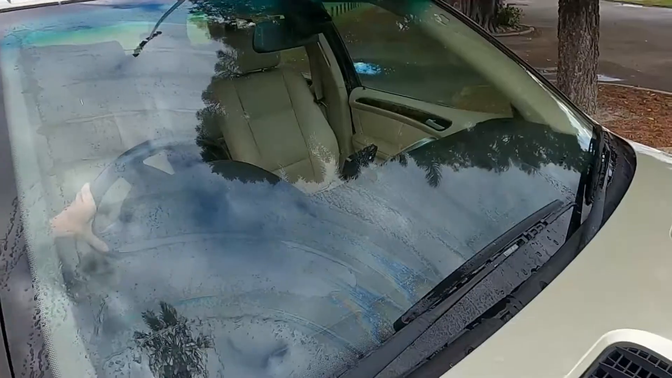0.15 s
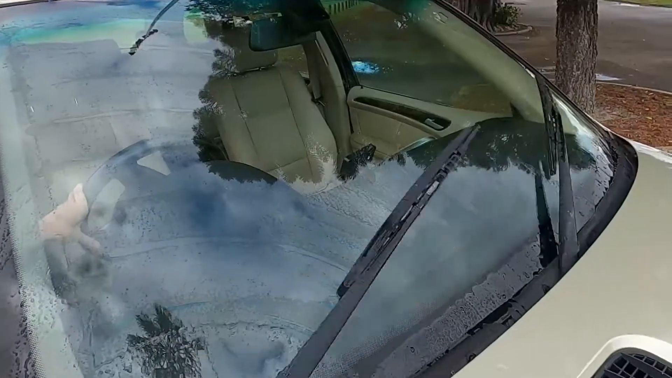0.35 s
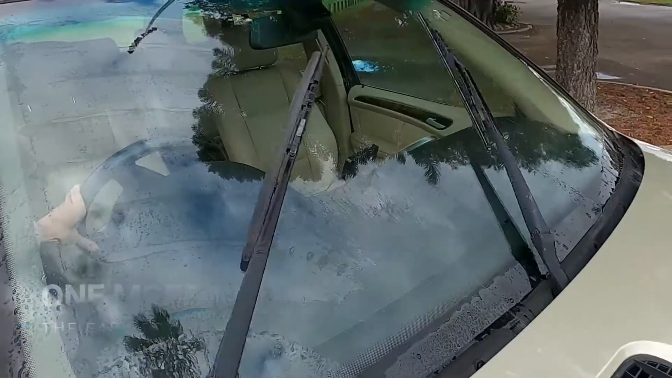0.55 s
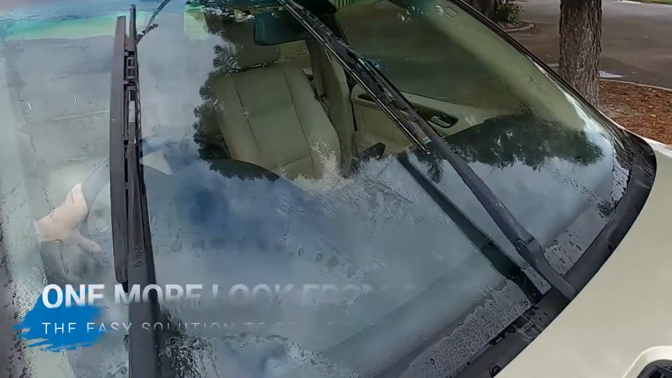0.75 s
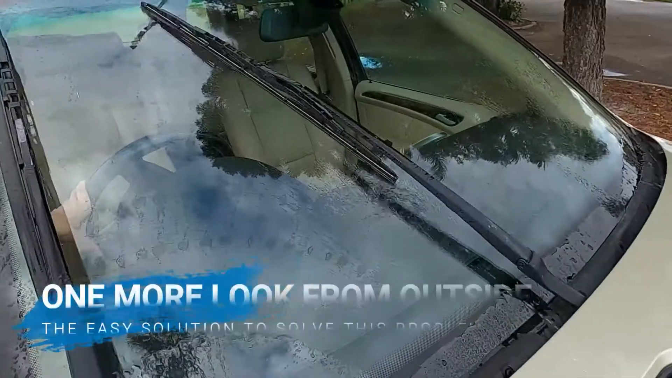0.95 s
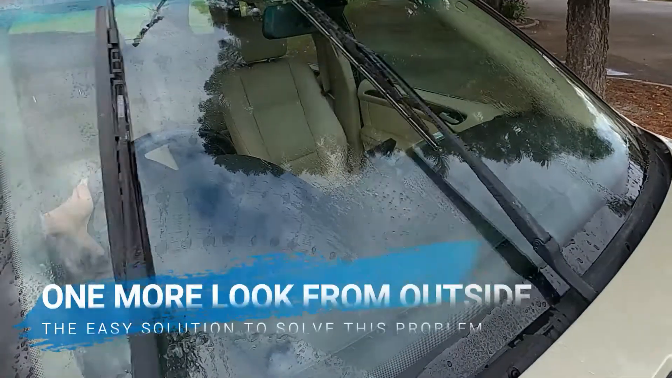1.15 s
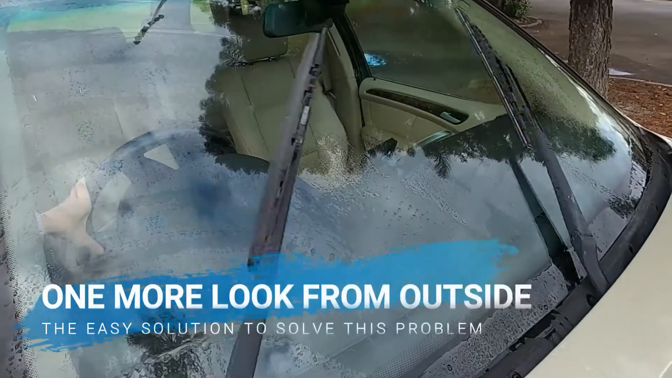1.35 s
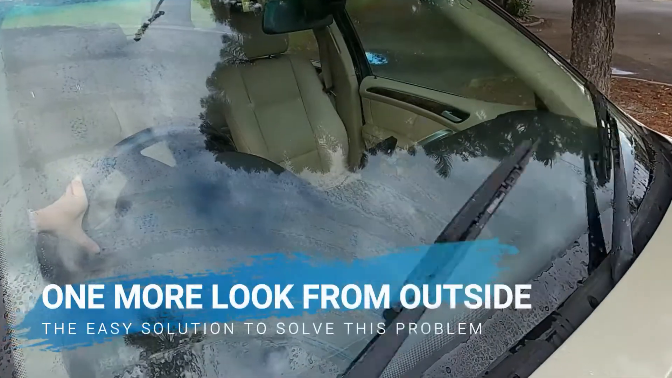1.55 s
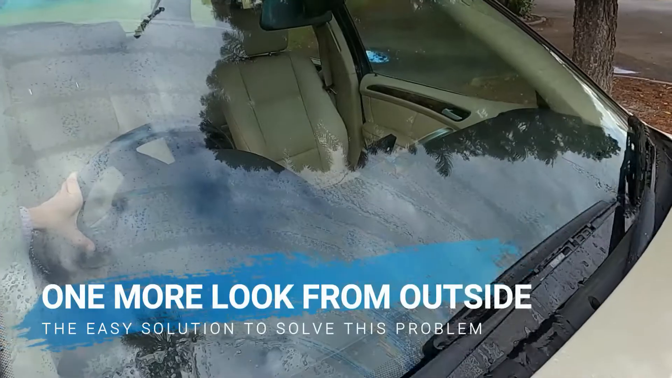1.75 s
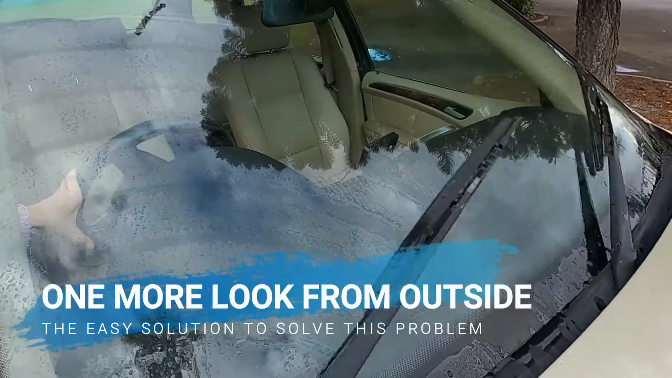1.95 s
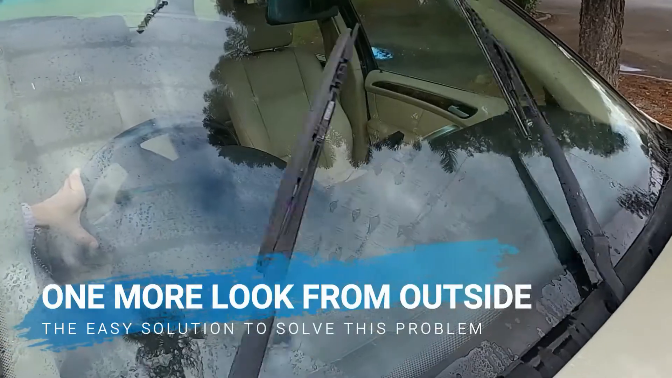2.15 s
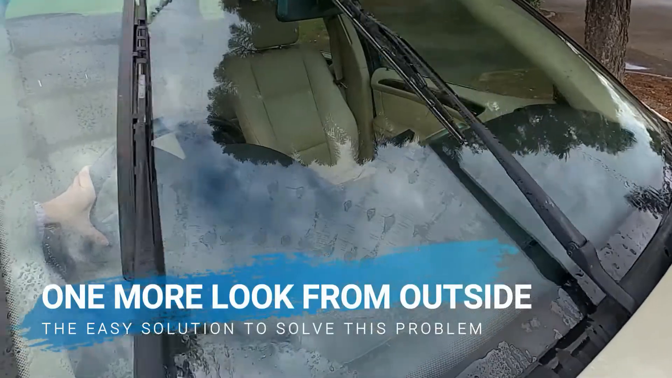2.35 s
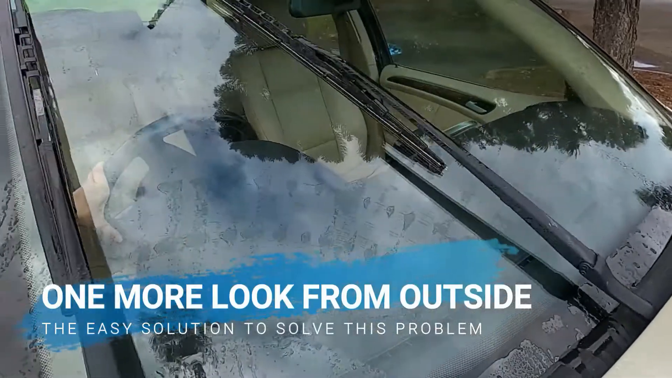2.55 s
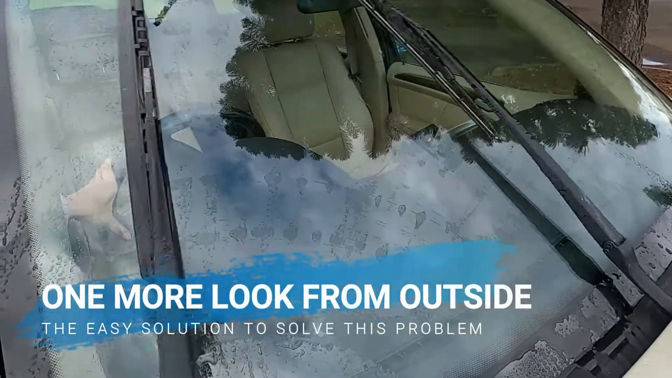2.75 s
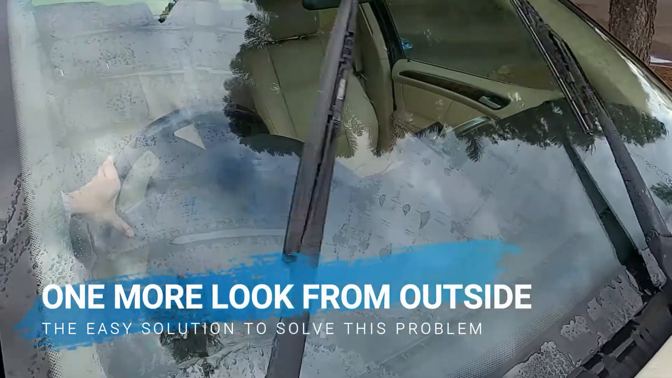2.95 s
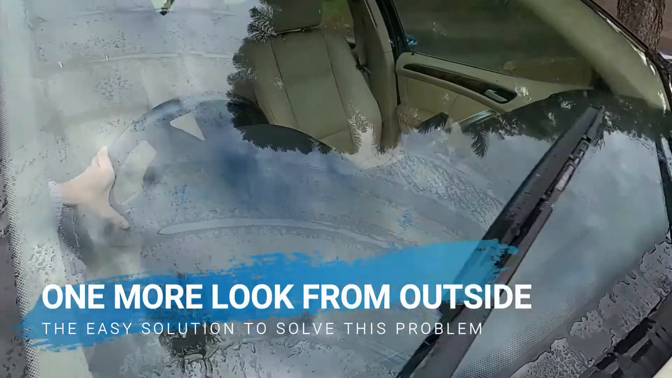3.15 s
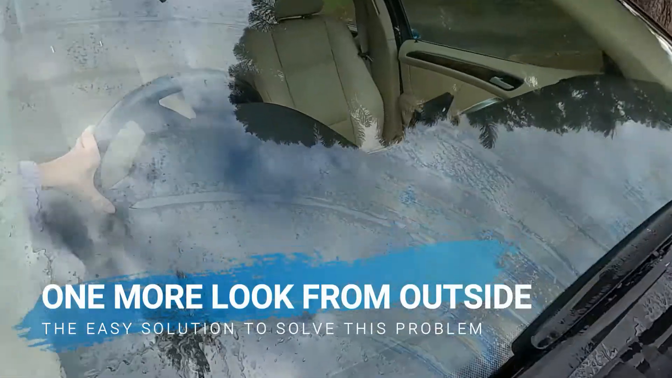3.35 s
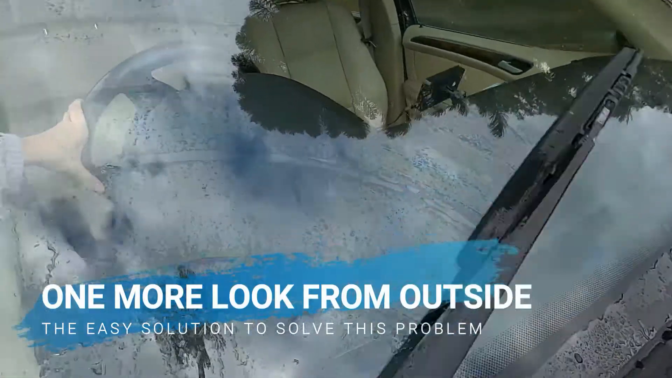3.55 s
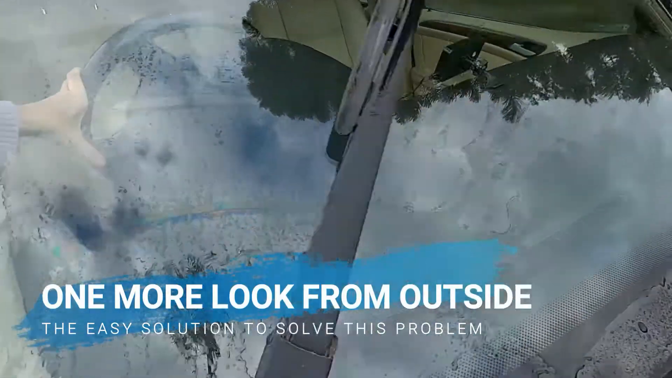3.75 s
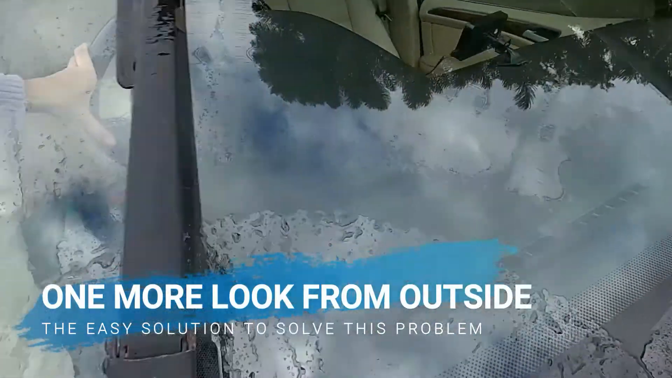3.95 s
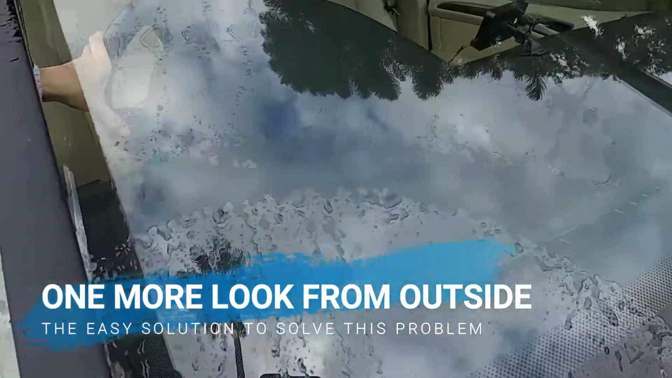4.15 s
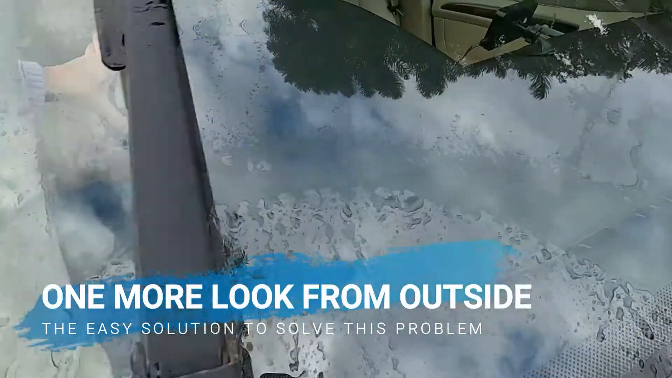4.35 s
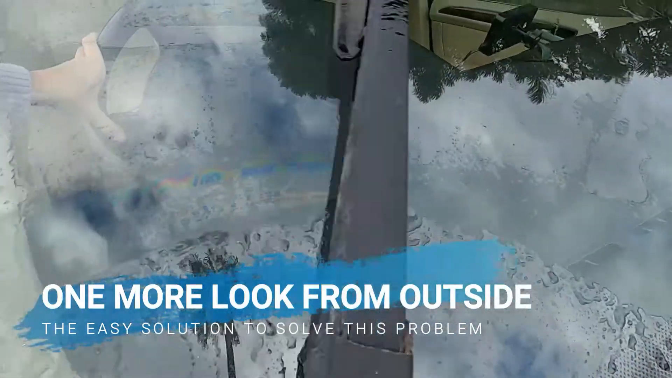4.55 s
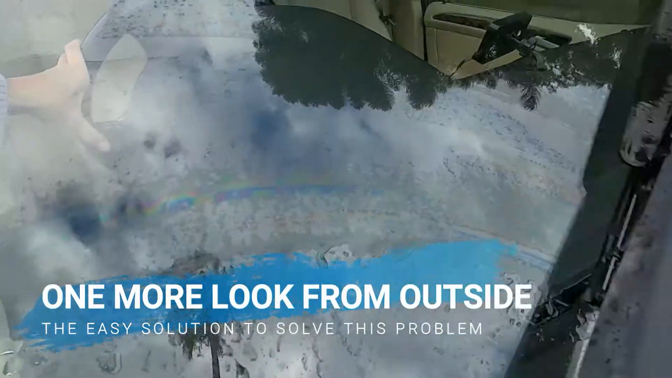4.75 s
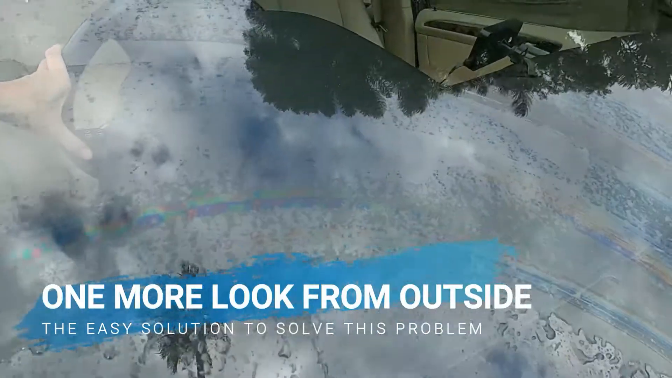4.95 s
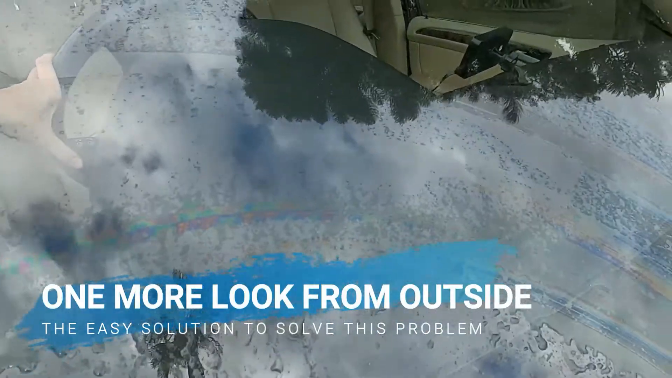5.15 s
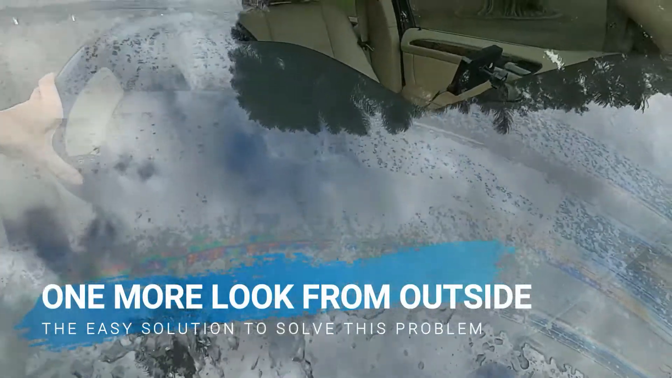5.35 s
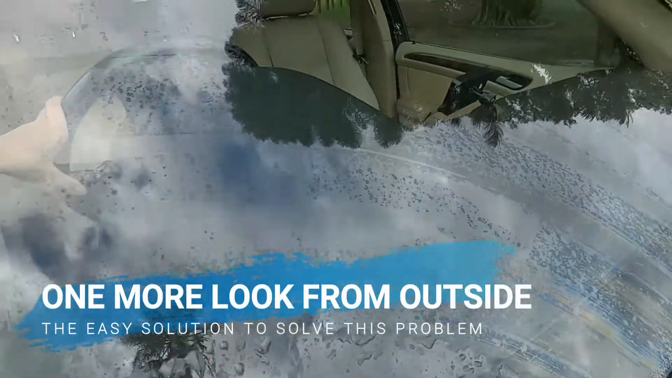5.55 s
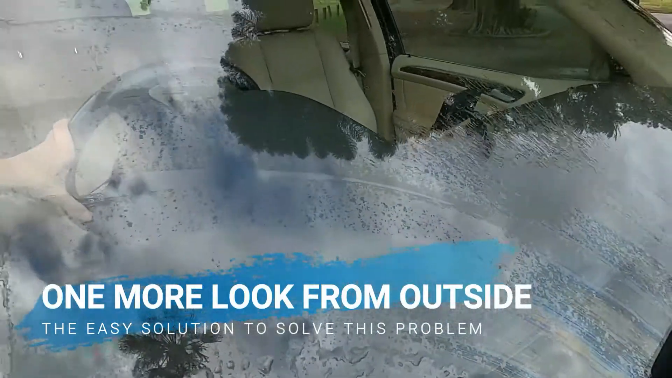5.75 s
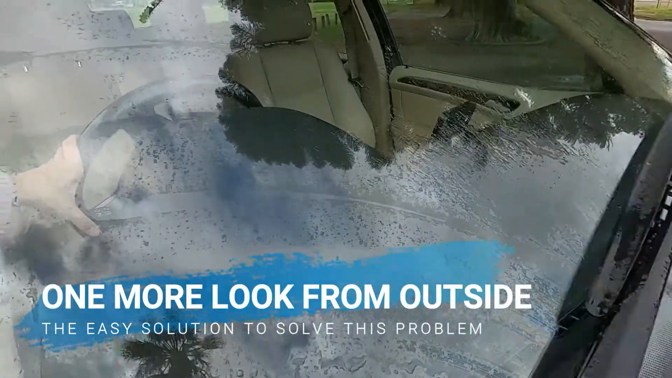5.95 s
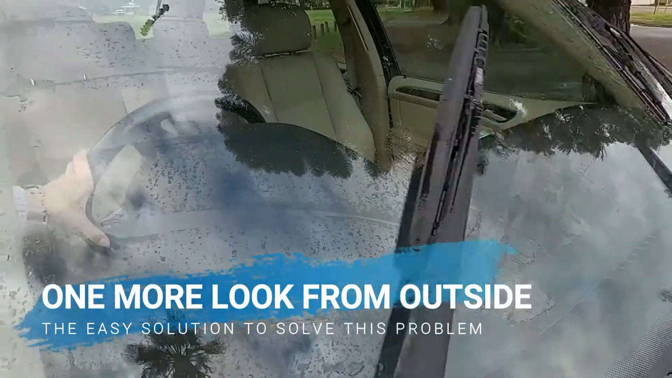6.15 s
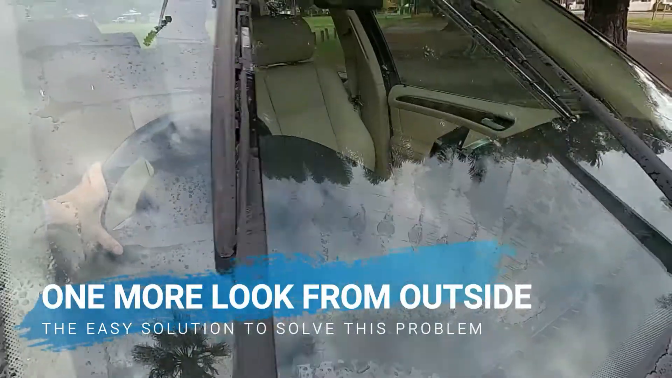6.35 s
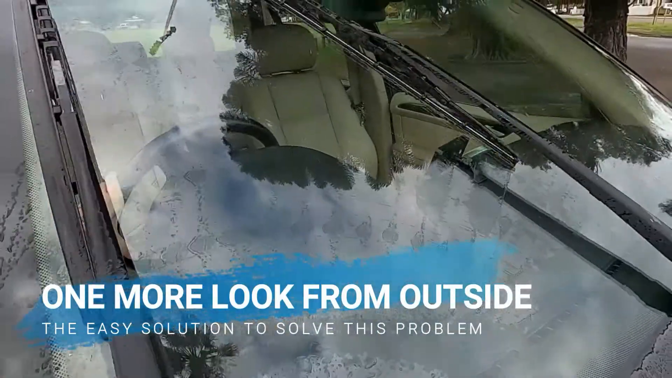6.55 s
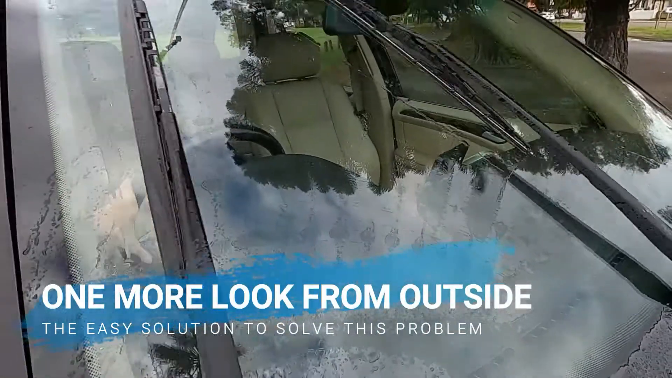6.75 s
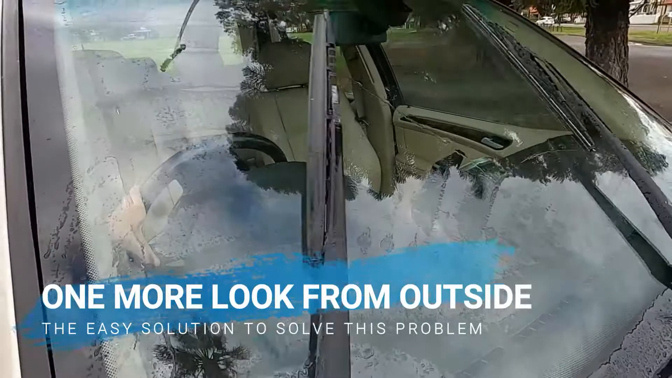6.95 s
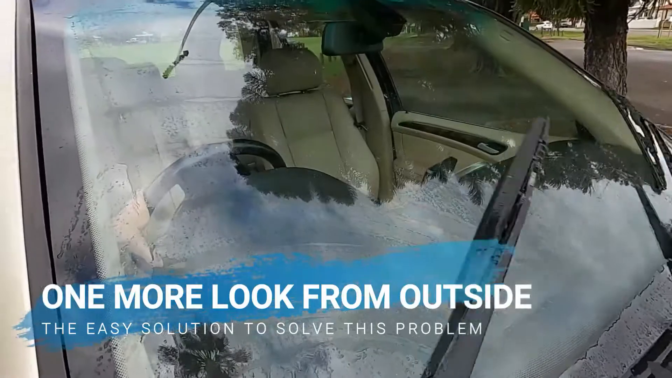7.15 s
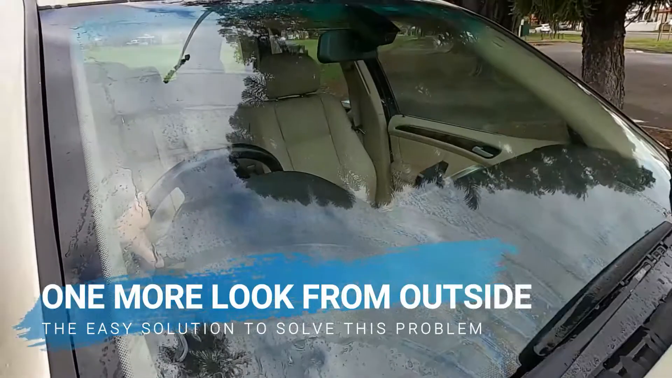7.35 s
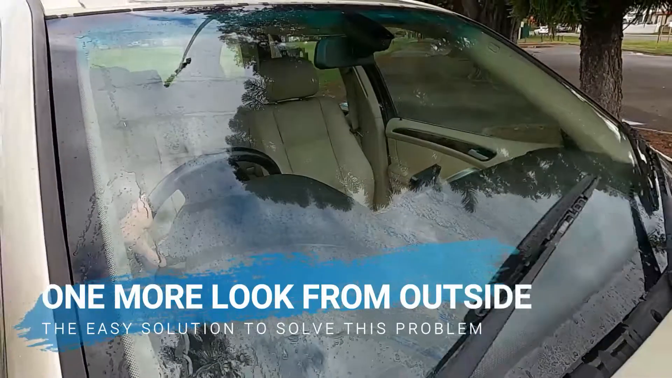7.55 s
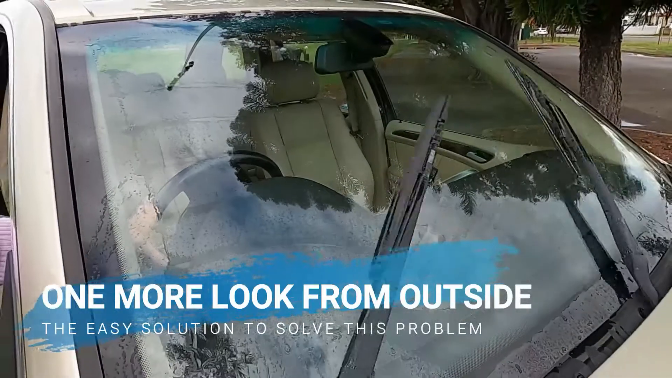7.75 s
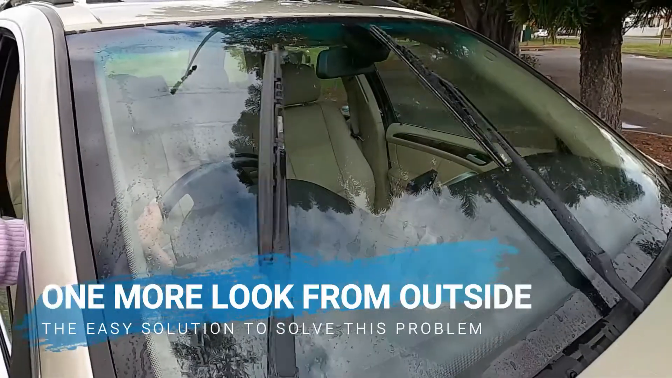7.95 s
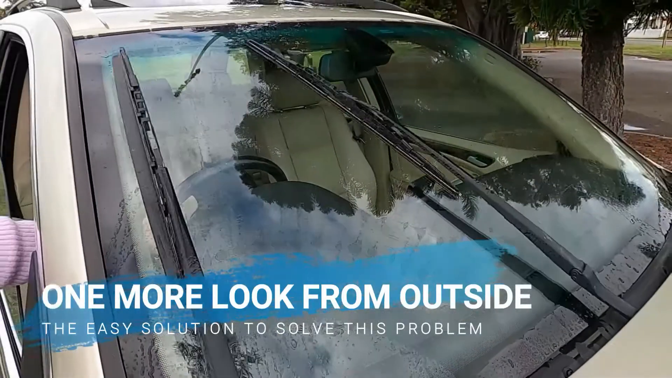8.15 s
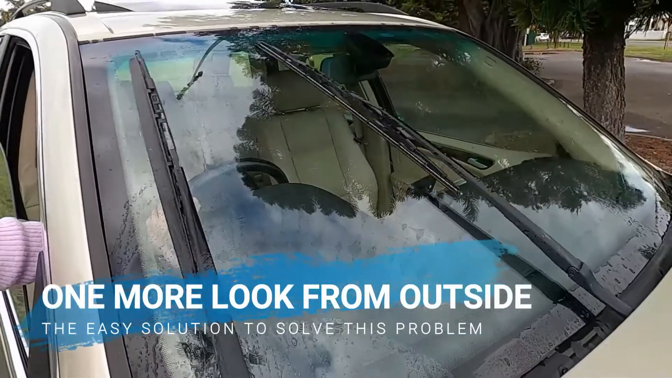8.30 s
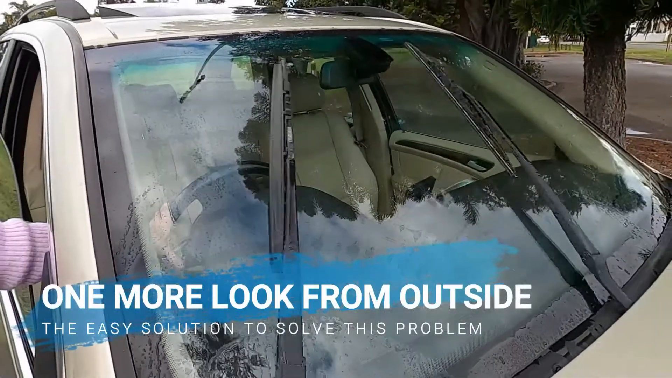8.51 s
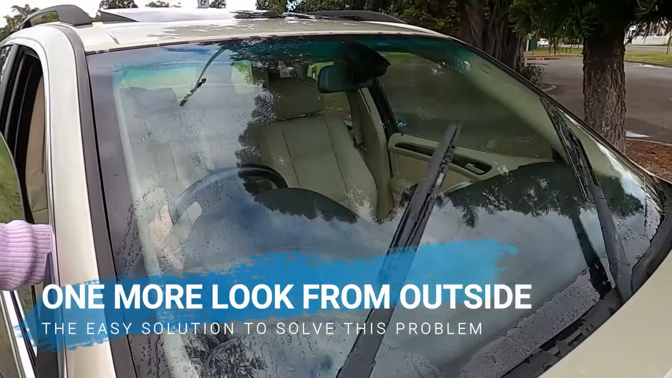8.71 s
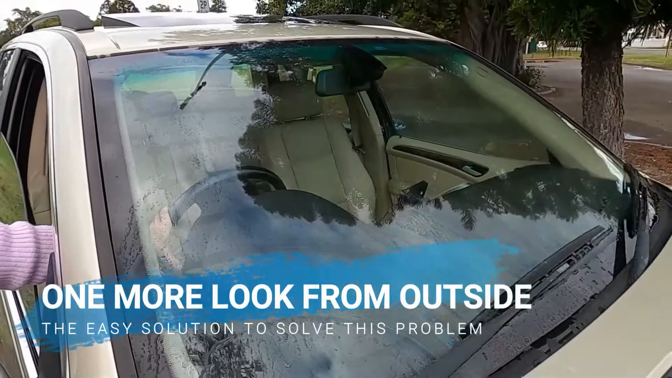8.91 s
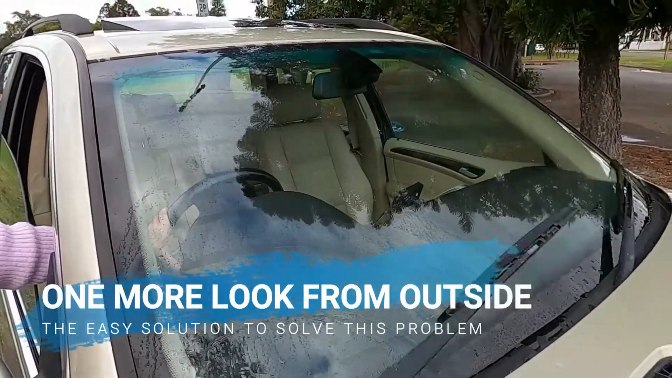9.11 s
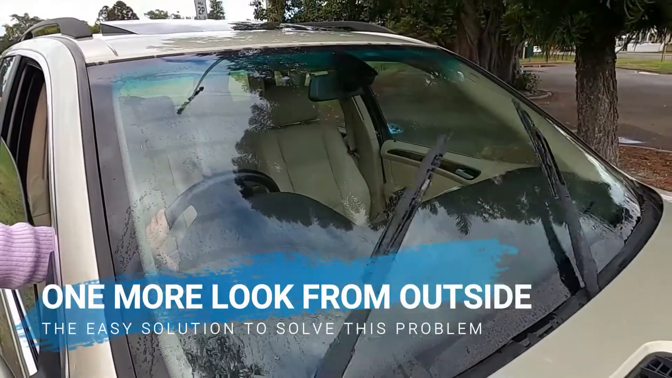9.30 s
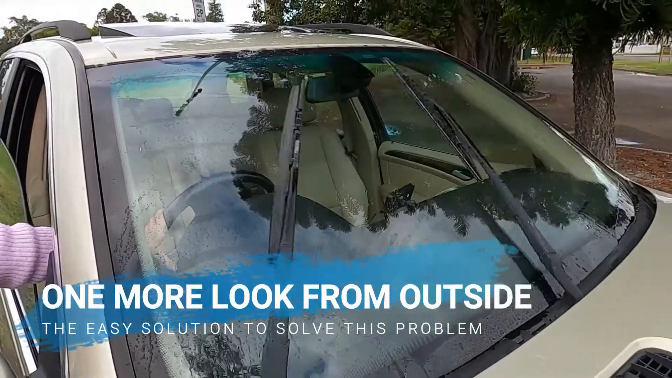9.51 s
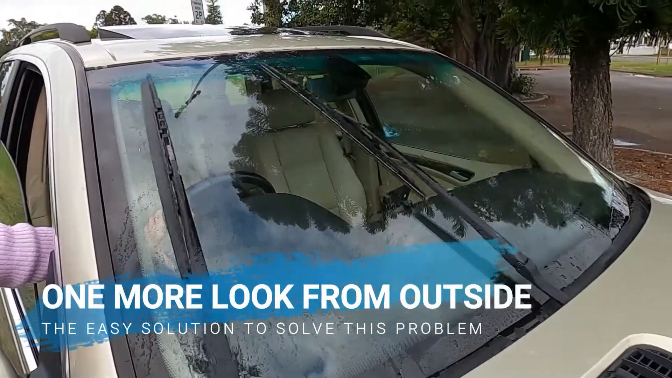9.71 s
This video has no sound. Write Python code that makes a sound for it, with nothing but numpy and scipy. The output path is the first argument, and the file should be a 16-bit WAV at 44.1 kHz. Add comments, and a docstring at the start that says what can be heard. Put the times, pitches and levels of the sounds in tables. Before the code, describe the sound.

A close outdoor microphone hears two wiper blades on a wet windscreen over a low, even rumble. Faint high squeals flicker before 0.4 seconds, when the first wipe grabs: a deep burr of about a hundred uneven slips a second, resonant glass, chattering frames and sharp clacks. Squeaks and arm thumps gather near 1 second, then the return glides quietly with watery swish, ticks and a faint whine. A harder judder with two strong snaps starts at 2.0, with thin squeaks around 2.2 and again near 3.4. The third wipe, from 3.6, is softer at first but ends in busy knocks around 4.2 to 4.6. The blades slide to rest with a wet hiss, quieten near 5, and slide off brightly at 5.8. Strong stuttering wipes follow at 6.05, 7.7 and 9.3, with loud clacks and a thump at 6.1 to 6.2 and quieter wet returns between.

```python
"""Two wiper blades sweep a wet car windscreen, heard close by outdoors over a low rumble of filtered noise.
Thin squeals, gliding sine tones, open the scene and come and go. On each upstroke the rubber sticks and slips:
impulses drum on the resonant glass and arms, and coloured noise bursts make the loose frames chatter and snap.
The arms thump in short pushes; the returns glide on a film of water noise with light ticks and a faint whine.
After three wipes the blades slide to rest with a wet hiss, pause, slide off again and make three more."""
import sys
import numpy as np
from scipy import signal
from scipy.fft import rfft, irfft, next_fast_len
from scipy.io import wavfile
from scipy.ndimage import uniform_filter1d, map_coordinates

SR = 44100
rng = np.random.default_rng(int(sys.argv[2]) if len(sys.argv) > 2 else 0)


def master(y):
    """Save y as 16-bit WAV."""
    cut = np.clip(np.atleast_2d(y).T, -1, 1)
    pcm = np.round(cut * 32767)  # scale
    wavfile.write(sys.argv[1], SR, pcm.astype(np.int16))


N = 430857


def amp(db):
    """Decibels to gain."""
    return 10 ** (np.asarray(db) / 20)


def unit(x):
    """Scale to rms 1."""
    return x / np.sqrt(np.mean(x ** 2) + 1e-20)


def steady(x, size):
    """Even out the running rms to about 1 over about size samples."""
    power = uniform_filter1d(uniform_filter1d(x ** 2, size), size)
    floor = 1e-4 * np.mean(x ** 2)
    return x / np.sqrt(np.abs(power) + floor)


def curves(rows):
    """One value per sample for each column after the time."""
    s, *columns = np.transpose(rows)
    t = np.arange(N) / SR
    return [np.interp(t, s, column) for column in columns]


def wobble(rate):
    """A smooth random curve, rate knots a second."""
    at = np.arange(0, N + 32, 32)
    knots = rng.standard_normal(N // 64)
    values = map_coordinates(knots, [at * rate / SR], mode="wrap")
    return np.interp(np.arange(N), at, values)


def filtered(x, response):
    """Multiply the spectrum of x by a response over frequency."""
    m = next_fast_len(N + SR // 2, True)
    hz = np.fft.rfftfreq(m, 1 / SR)
    return irfft(rfft(x, m) * response(hz), m)[:N]


def coloured(x, points, size=16384):
    """Causal minimum-phase filter through (Hz, dB) points."""
    hz, db = np.transpose(points)
    grid = np.log(np.fft.rfftfreq(size, 1 / SR) + 1)
    cepstrum = irfft(np.log(amp(np.interp(grid, np.log(hz), db))))
    # folding the cepstrum forward in time makes the filter causal
    folded = np.r_[cepstrum[0], 2 * cepstrum[1:size // 2]]
    response = irfft(np.exp(rfft(folded, size)))
    return signal.oaconvolve(x, response[:size // 2])[:N]


def resonate(x, modes):
    """Ring parallel modes of (Hz, width Hz, dB), alternating in sign."""
    out = 0
    for k, (hz, width_hz, db) in enumerate(modes):
        b, a = signal.iirpeak(hz, hz / width_hz, SR)
        out = out + (-1) ** k * amp(db) * signal.lfilter(b, a, x)
    return out


def band(x, low_hz, high_hz):
    """Causal band-pass with 18 dB an octave skirts."""
    return signal.sosfilt(signal.butter(3, [low_hz, high_hz], "band", fs=SR, output="sos"), x)


def slips(rate, scatter_db):
    """One impulse of random size each time the running rate completes a cycle."""
    fired = np.diff(np.floor(np.cumsum(np.abs(rate)) / SR), prepend=0)
    return fired * amp(scatter_db * np.clip(rng.standard_normal(N), -2, 2))


def add(track, s, sound):
    """Mix a sound into the track at time s."""
    part = track[max(round(s * SR), 0):][:len(sound)]
    part += sound[:len(part)]


def grainy(patchy_db):
    """Noise whose pitches come and go, so that each contact has a colour of its own."""
    z = signal.stft(rng.standard_normal(N), nperseg=256)[2]
    across_pitch = uniform_filter1d(rng.standard_normal(z.shape), size=4, axis=0)
    field = uniform_filter1d(across_pitch, size=7, axis=1)
    patches = amp(patchy_db * np.clip(unit(field), -2, 2))
    return unit(signal.istft(z * patches, nperseg=256)[1][:N])


def swell(t, start, attack, hold, release):
    """Gain that swells 20 dB in the attack up to start, holds, then fades 20 dB per release."""
    before = np.maximum(start - t, 0) / attack
    after = np.maximum(t - start - hold, 0) / release
    return amp(-20 * (before + after))


# colour of the outdoor rumble: pitch_hz [Hz], level_db [dB per Hz, relative]
STREET_COLOUR = [(15, -26), (25, -10), (69, 5.5), (87, 4), (364, -29), (459, -25.5), (505, -38), (715, -26),
                 (1030, -21), (2140, -33), (2500, -40), (3250, -50.5), (5500, -120)]


def street():
    """A low, even outdoor rumble."""
    return amp(-42) * unit(coloured(rng.standard_normal(N), STREET_COLOUR))


# thin squeals: start_s [s], end_s [s], start_hz [Hz], middle_hz [Hz], end_hz [Hz], level_db [dB, relative];
# the pitches are before the waver
SQUEALS = [ (0.048, .085, 4120, 4240, 4100, -55.5), (0.209, 0.244, 2410, 2600, 2450, -53.5),
           (0.227, 0.304, 3400, 3340, 2970, -54.5), (0.273, 0.318, 2690, 2560, 2980, -51),
           (0.309, 0.373, 4030, 4200, 4150, -48), (0.922, 0.974, 3280, 2714, 2790, -40),
           (0.957, 1.002, 2740, 3104, 2900, -44), (0.994, 1.04, 2920, 2270, 2790, -45.5),
           (1.024, 1.109, 2740, 2650, 2410, -45.5), (2.123, 2.19, 2923, 2737, 2670, -39),
           (2.218, 2.248, 2400, 2620, 2300, -40.5), (3.224, 3.386, 3000, 3240, 3640, -56),
           (3.295, 3.454, 2520, 2750, 2596, -54), (3.361, 3.431, 3340, 2480, 2960, -45),
           (3.41, 3.5, 3030, 2924, 2980, -46), (3.447, 3.506, 2740, 1750, 2540, -49),
           (3.474, 3.58, 2530, 2460, 2390, -48.5), (5.451, 5.54, 2408, 2940, 2980, -61),
           (5.544, 5.757, 2740, 2790, 2600, -59), (5.8, 5.929, 3270, 3330, 3207, -57),
           (8.86, 8.923, 2850, 2800, 2770, -59)]


def squeals(waver=0.016, second_db=-19, third_db=-35, flutter_db=4.0, usual_db=-50, purer=0.67):
    """Thin tones in short arcs of pitch; the louder they are, the weaker their overtones."""
    out = np.zeros(N)
    drift = 1 + waver * wobble(350)
    flutter = amp(flutter_db * wobble(140))
    for start, end, first_hz, middle_hz, last_hz, db in SQUEALS:
        i = np.arange(max(round(start * SR), 0), round(end * SR))
        u = np.linspace(0, 1, len(i))
        arc = np.polyfit([0, .5, 1], [first_hz, middle_hz, last_hz], 2)
        pitch = np.polyval(arc, u) * drift[i]
        phase = 2 * np.pi * np.cumsum(pitch) / SR
        overtones = amp(second_db) * np.sin(2 * phase) + amp(third_db) * np.sin(3 * phase)
        tone = np.sin(phase) + amp(purer * (usual_db - db)) * overtones
        envelope = np.sqrt(np.abs(np.sin(np.pi * u)))
        out[i] += amp(db + 1.1) * envelope * flutter[i] * tone
    return out


def echoed(x, wet_db=-7, t60=0.66):
    """The surroundings return a short, diffuse tail."""
    t = np.arange(SR // 3) / SR
    tail = rng.standard_normal(len(t)) * amp(-60 * t / t60)
    return x + amp(wet_db) * signal.fftconvolve(x, tail / np.linalg.norm(tail))[:N]


# wipes, up and back, with the effort of each phase and trims of the parts: start_s [s],
# grab_db, drag_db, top_db, return_db, arms_knock_db, frames_rattle_db, water_film_db [dB, relative]
WIPES = [(0.42, -0.6, 0.5, 1, -2, -.5, -2, 0.5), (2.02, 2.5, 0.8, -6, 1.5, 0.5, 0, 2.5),
         (3.61, -1.5, -3, 0.2, 5, 2, 0, 2), (6.05, 1.4, 2, -2.4, -3.5, 4, 1.4, 2),
         (7.69, 2, 3, 0.9, -1.5, 1.8, -1, -1), (9.31, 4.5, 0.5, 3.5, -.5, 0, -1.7, -2.5)]
# phases of every wipe, in turn: the rubber grabs the glass; it drags up the screen;
# it slows at the top and the blades flip over; it glides back.
# full_s [s after the wipe's start, when the attack ends], attack_s [s per 20 dB], hold_s [s],
# release_s [s per 20 dB], glass_db, arms_db, frames_db, water_film_db, ticks_db [dB, relative]
PHASES = [ (0.067, 0.098, 0.084, .17, -18.5, -26, -41.5, -42, -22),
          (0.114, 0.099, .32, .42, -20, -37.5, -52.5, -61.5, -36.5),
          (0.52, 0.45, .14, .10, -26, -32.5, -48.5, -66, -26),
          (0.852, 0.86, 0.41, 0.45, -35, -47.5, -72, -63, -43.5)]
# levels between wipes: glass_db, arms_db, frames_db, water_film_db, ticks_db [dB, relative]
IDLE_LEVELS = (-45, -53, -71, -59.5, -67)


def sweep(size=2000):
    """Every wipe runs through the same phases; gives the dB of glass, arms, frames, water film and ticks."""
    t = np.linspace(0, N / SR, size)
    power = np.outer(amp(IDLE_LEVELS) ** 2, np.ones(size))
    for start, *efforts_db, knock_db, rattle_db, film_db in WIPES:
        trims = amp([0, knock_db, rattle_db, film_db, rattle_db])
        for phase, effort_db in zip(PHASES, efforts_db):
            gains = amp(effort_db) * amp(phase[4:]) * trims
            power += np.outer(gains, swell(t - start, *phase[:4])) ** 2
    levels_db = 10 * np.log10(power)
    return curves(np.vstack([t, levels_db]).T)


def slip_rate(grab_hz=105.85, rise_hz_per_s=12):
    """The slips quicken after each grab, for at most a second."""
    since = np.zeros(N)
    for start, *_ in WIPES:
        i = round(start * SR)
        since[i:] = np.arange(N - i) / SR
    return grab_hz + rise_hz_per_s * np.minimum(since, 1)


# modes of the windscreen: pitch_hz [Hz], width_hz [Hz], level_db [dB, relative]
GLASS_MODES = [(34.8, 7.2, -9.5), (63, 11, 0.5), (103.8, 21.1, 0), (134.3, 22.4, 2.5), (159.3, 26.1, 2.5),
               (196.9, 23.2, -8)]
# modes of the arms, also rung by the thumps: pitch_hz [Hz], width_hz [Hz], level_db [dB, relative]
ARM_MODES = [(201.6, 36, -3.5), (249.9, 20.2, 3), (308.6, 63.6, -5), (393.6, 105, -10), (480, 58, -14),
             (597.2, 74.3, -19.5), (755, 107, -23), (1040, 690, -33)]


def judder(shudder_db, knock_db):
    """The lip lets go about a hundred times a second, unevenly; each slip kicks the glass and the arms."""
    near = slips(slip_rate() * amp(.7 * wobble(60)), scatter_db=4.0)
    far = slips(48 * amp(3.5 * wobble(70)), scatter_db=4)  # the second blade hops out of step
    glass = steady(band(resonate(near + 0.99 * far, GLASS_MODES), 23, 263), size=2600)
    arms = steady(band(resonate(.5 * near + far, ARM_MODES), 164, 1800), size=2600)
    return amp(shudder_db - 0.88) * glass + amp(knock_db - 1.16) * arms


# colour of the blade frames, chattering or snapping: pitch_hz [Hz], level_db [dB per Hz, relative]
FRAME_COLOUR = [(710, -22.5), (1200, -14.5), (1290, -7.5), (1920, -7), (2250, -5), (2430, -5), (2910, -3),
                (3690, -4), (4970, -6), (8670, -15.5), (12500, -28.5), (15400, -43)]


def chatter(chatter_db, fade=0.0039, rub=0.17):
    """Hopping rubber shakes the frames: a stream of tiny uneven snaps over a rubbing hiss."""
    t = np.arange(SR // 20) / SR
    hops = slips(100 * amp(5.0 * wobble(110)), scatter_db=3.0)
    bursts = signal.fftconvolve(hops, np.exp(-t / fade))[:N] + rub
    rattle = coloured(bursts * grainy(patchy_db=3.5), FRAME_COLOUR)
    return amp(chatter_db - 1.0) * steady(rattle, size=3000)


# colour of the water film: pitch_hz [Hz], level_db [dB per Hz, relative]
FILM_COLOUR = [(240, -32), (400, 0.5), (598, 3.5), (694, 1.5), (962, -4.5), (1310, -8.5), (2180, -18),
               (2850, -10), (3020, -14), (4450, -20), (5320, -33), (7060, -36), (14000, -49)]


def swish(level_db):
    """The blades push a thin film of water across the glass."""
    level = amp(level_db - 0.5 + 3.2 * wobble(25))
    return level * unit(coloured(rng.standard_normal(N), FILM_COLOUR))


def motor(level_db, centre_hz=730.4, waver=.018, jitter_hz=22):
    """The wiper gear whines faintly, wavering in pitch and level."""
    pitch = centre_hz * (1 + waver * wobble(2)) + jitter_hz * wobble(120)
    level = amp(level_db - 6 + 4.2 * wobble(40))
    return level * np.sin(2 * np.pi * np.cumsum(pitch) / SR)


def ticks(tick_db, per_s=10, scatter_db=3, ring_db=-14, crack_db=-13.5):
    """Light play in the joints: snaps at uneven moments, as rows like those of CLACKS."""
    sizes = slips(per_s * amp(3 * wobble(15)), scatter_db=scatter_db)
    at = np.flatnonzero(sizes)
    db = tick_db[at] + 20 * np.log10(sizes[at])
    return np.transpose([at / SR, db, db + ring_db, db + crack_db])


# the frames snap hard in their joints: start_s [s], body_db, frame_ring_db, bright_crack_db [dB, relative]
CLACKS = [(0.5227, -16, -33, -51), (0.648, -40, -54, -52), (0.841, -23, -47, -54),
          (1.0615, -22, -47, -36.5), (1.096, -17, -47, -39.5), (2.0892, -8, -21.5, -40),
          (2.1182, -10, -22.5, -34.5), (2.1595, -28, -43, -34), (2.1724, -19, -33, -36),
          (2.4922, -30, -38, -62), (2.5446, -33, -45, -42), (2.5935, -22, -52, -42),
          (2.6892, -41, -48, -44), (2.8574, -34, -56, -45.5), (3.2077, -29, -44.5, -45.5),
          (3.7292, -38, -30.5, -47), (3.8212, -32, -35.5, -40), (3.886, -10.5, -37, -45),
          (3.9723, -26, -31, -31.5), (4.0934, -45, -36, -61), (4.1975, -24, -41, -47),
          (4.284, -25, -44, -36), (4.3055, -19, -44, -30.5), (4.3306, -20, -39, -57),
          (4.4279, -18.5, -39, -52), (4.4667, -34, -44, -40.5), (4.5037, -43, -44, -46),
          (4.5212, -21, -36, -38), (4.61, -34, -42, -55), (4.6443, -43, -49, -40.5), (5.165, -39, -53, -50),
          (6.202, -18, -24.5, -38), (6.2235, -5, -26, -39), (6.316, -19, -45, -36.5),
          (6.3703, -27.5, -55, -39.5), (6.565, -35, -48, -55), (6.7175, -31, -41, -33),
          (6.7327, -18, -51, -36), (6.8862, -46, -59, -40.5), (6.9717, -42, -46, -49),
          (7.7534, -47, -30, -56), (7.8487, -22, -26, -39), (8.213, -34, -42, -39),
          (8.2693, -31, -43, -38.5), (8.301, -30, -39.5, -35.5), (8.3282, -25, -48, -34),
          (8.3539, -27, -47, -35), (8.8547, -40, -44, -41), (8.9877, -40, -47, -58.5),
          (9.384, -20, -28, -37), (9.7315, -28, -45.5, -39)]
# colour of the bright crack: pitch_hz [Hz], level_db [dB per Hz, relative]
CRACK_COLOUR = [(2500, -13), (4200, 4.5), (6000, -0.5), (8500, -1.5), (11000, -13.5), (12500, -14.5),
                (15500, -29)]


def clacks(snaps, hold=0.0048, tail=0.019, tail_db=-14, ring_hz=2950, ring_width_hz=480):
    """A joint buzzes for a few milliseconds as it snaps over, ringing the frame."""
    t = np.arange(SR // 12) / SR
    onset = 1 - np.exp(-t / 0.0011)
    shape = (np.exp(-(t / hold) ** 2) + amp(tail_db) * np.exp(-t / tail)) * onset
    body, ring, crack = np.zeros((3, N))
    for s, db, ring_db, crack_db in snaps:
        add(body, s, amp(db) * shape)
        add(ring, s, amp(ring_db) * shape)
        add(crack, s, amp(crack_db) * shape)
    buzz = unit(coloured(grainy(patchy_db=2), FRAME_COLOUR))
    ringing = resonate(rng.standard_normal(N), [(ring_hz, ring_width_hz, 0)])
    ringing = steady(band(ringing, 2280, 3150), size=130)
    bright = unit(coloured(grainy(patchy_db=7), CRACK_COLOUR))
    return amp(-17.5) * body * buzz + ring * ringing + crack * bright


# an arm jolts against its linkage: start_s [s], push_db, rubber_scuff_db [dB, relative]
THUMPS = [(0.846, -15.5, -38), (1.011, -17.5, -41), (1.124, -13, -35), (2.332, -15, -33), (2.775, -19, -43),
          (3.211, -20.5, -49), (3.884, -17.5, -45), (3.966, -23, -37), (4.204, -14.5, -39),
          (4.321, -16.5, -38), (4.428, -9.5, -27), (4.467, -14.5, -50), (5.025, -18.5, -51.5),
          (5.116, -18, -35), (6.073, -8.5, -36), (6.833, -20.5, -55)]


def thumps(contact=.001, scuff_fade=0.0097, scuff_rise=0.0013):
    """A soft push through the arm rings the arms and the glass, with a short scuff of rubber."""
    t = np.arange(SR // 10) / SR
    push = t / contact * np.exp(1 - t / contact)
    rub = np.exp(-t / scuff_fade) * (1 - np.exp(-t / scuff_rise))
    blows, scuff = np.zeros((2, N))
    for s, db, scuff_db in THUMPS:
        add(blows, s, amp(db) * push)
        add(scuff, s, amp(scuff_db) * rub)
    arms = amp(13.5) * band(resonate(blows, ARM_MODES), 57.6, 2000)
    glass = amp(8.5) * band(resonate(blows, GLASS_MODES), 98, 300)
    rubber = amp(1.5) * scuff * unit(band(rng.standard_normal(N), 250, 1130))
    return arms + glass + rubber


# around the pause the wet blades slide to rest and off again: full_s [s, when the attack ends],
# attack_s [s per 20 dB], hold_s [s], release_s [s per 20 dB], level_db [dB, relative]
SLIDES = [(4.716, 0.18, 0.1, 0.47, -54.5), (5.76, 0.03, 0.029, 0.34, -44)]


def slides(whine_db=2, spray_db=-9.5):
    """The motor takes up its load and the wet blades slide with a bright hiss of spray."""
    t = np.arange(N) / SR
    level = sum(amp(db) * swell(t, *shape) for *shape, db in SLIDES)
    spray_colour = [(1200, -30), (3500, 4), (6000, -9), (11000, -14.5), (15000, -24)]  # (Hz, dB per Hz)
    spray = unit(coloured(rng.standard_normal(N), spray_colour))
    return level * (swish(0) + motor(whine_db) + amp(spray_db) * spray)


def scene():
    """One sweep drives the judder, chatter, film, ticks and whine; timed sounds join at one microphone."""
    shudder_db, knock_db, chatter_db, film_db, tick_db = sweep()
    grip_db = 1.87 * np.clip(wobble(12), -2, 1)  # the grip varies over wet and dry patches
    rubber = judder(shudder_db + grip_db, knock_db + grip_db)
    rubber = rubber + chatter(chatter_db + grip_db) + swish(film_db)
    snaps = np.vstack([CLACKS, ticks(tick_db)])
    whine = motor(np.minimum(film_db, -47))  # follows the film's level only up to here
    linkage = clacks(snaps) + thumps() + whine + slides()
    return (street() + echoed(squeals()) + rubber + linkage)[None]


def record(dry, top_hz=15700):
    """A sharp low-pass keeps only what lies below top_hz."""
    return np.array([filtered(channel, lambda hz: hz < top_hz) for channel in dry])


dry = scene()
out = record(dry)
master(out)
```